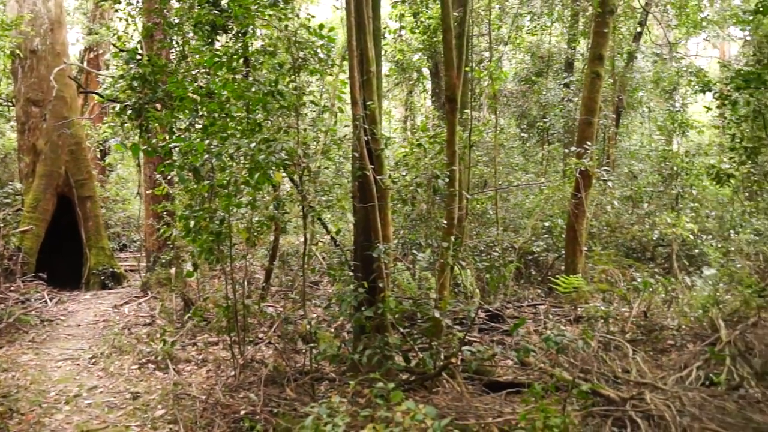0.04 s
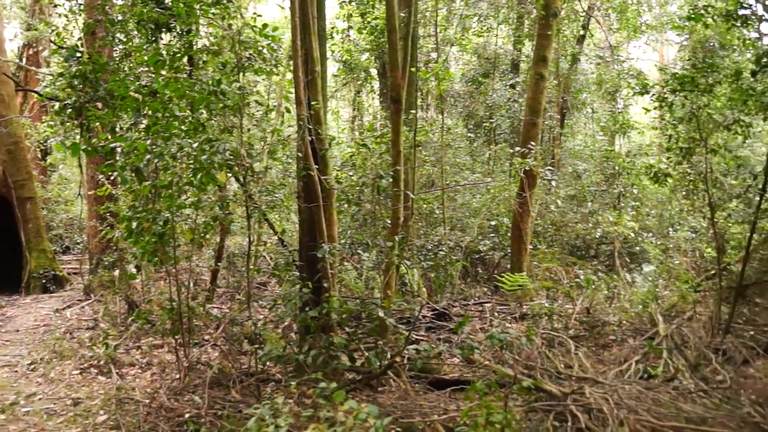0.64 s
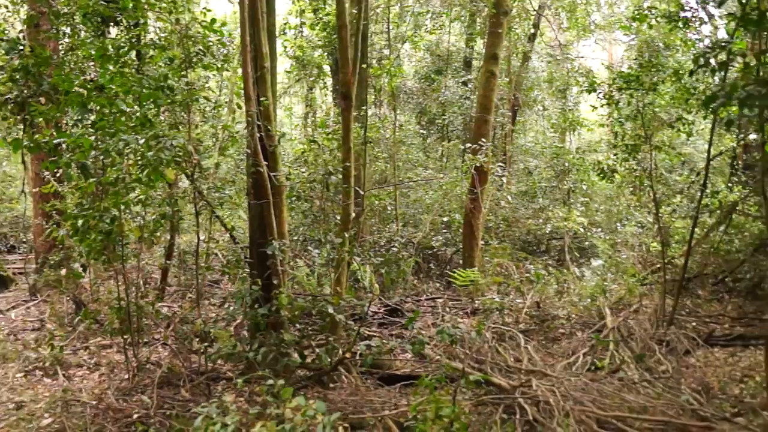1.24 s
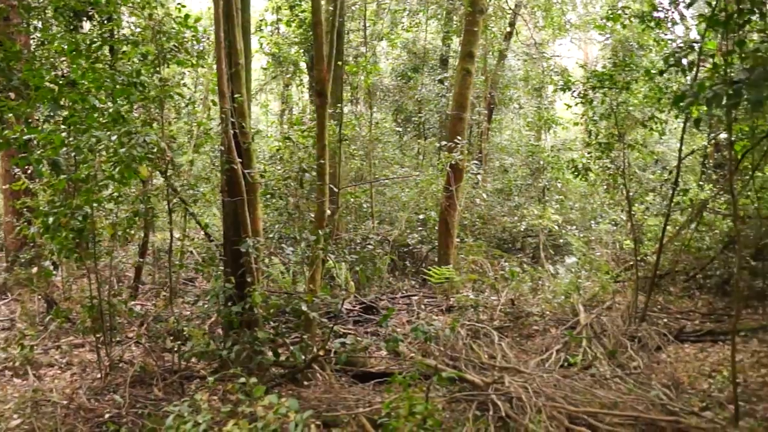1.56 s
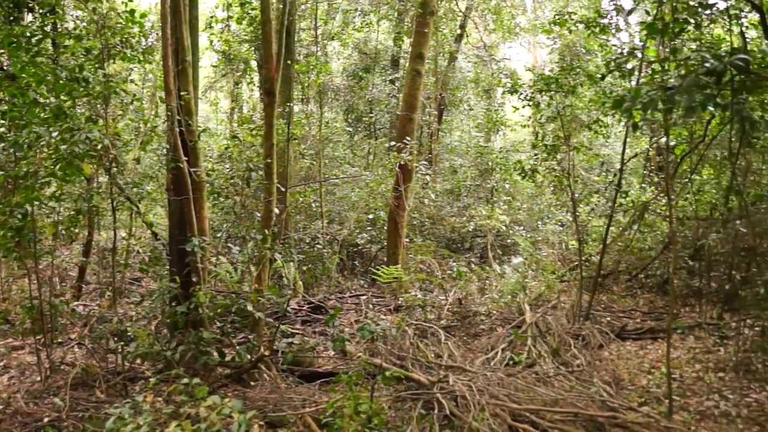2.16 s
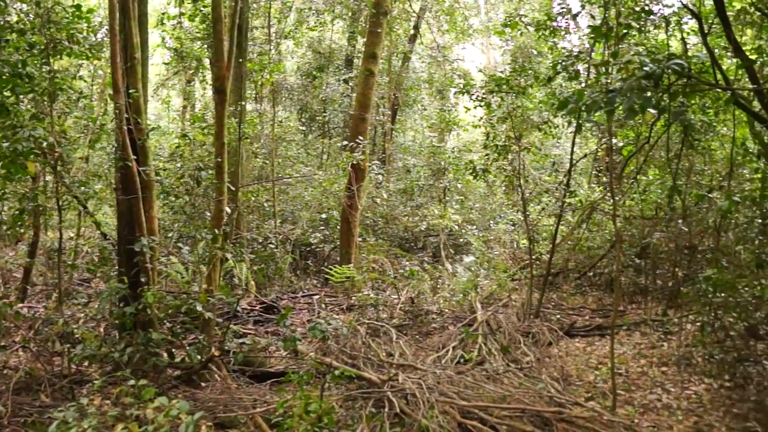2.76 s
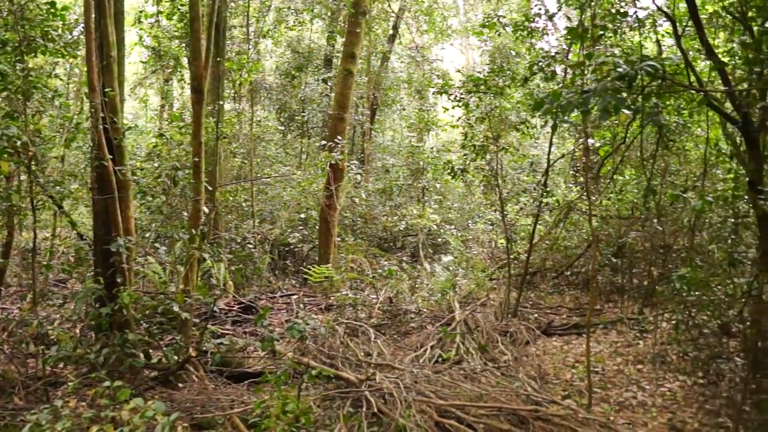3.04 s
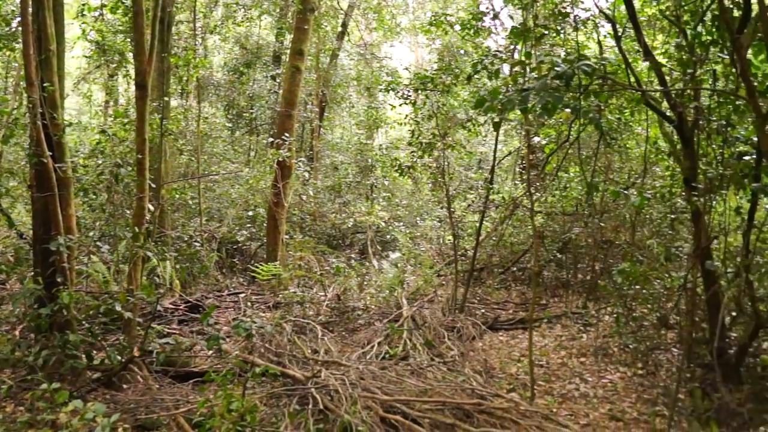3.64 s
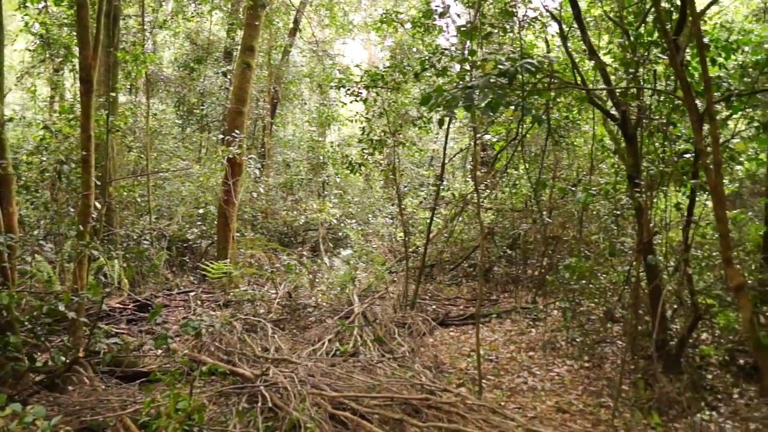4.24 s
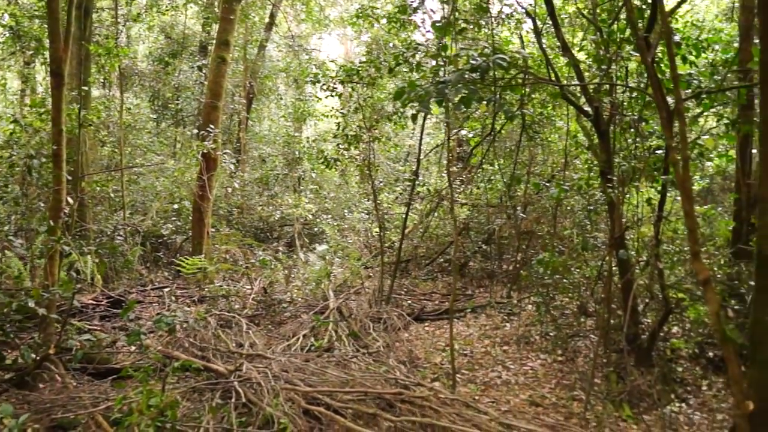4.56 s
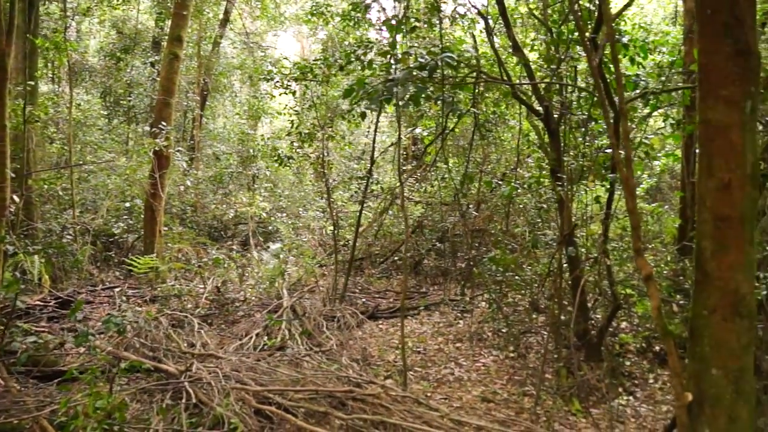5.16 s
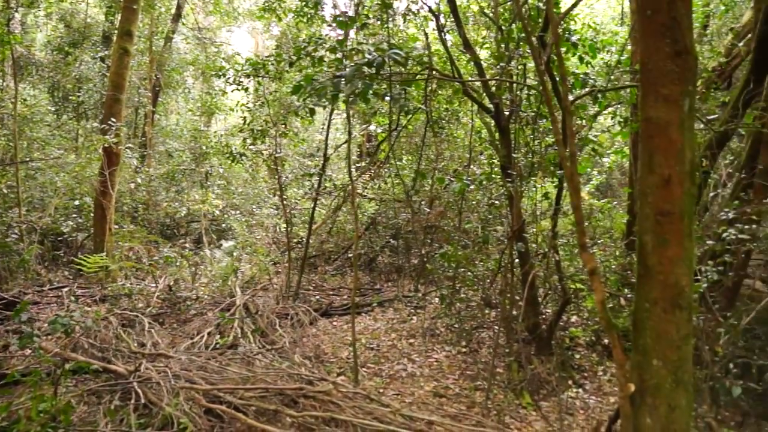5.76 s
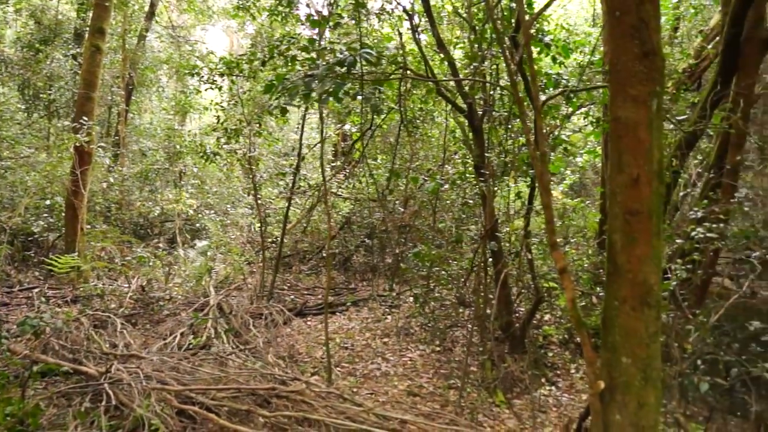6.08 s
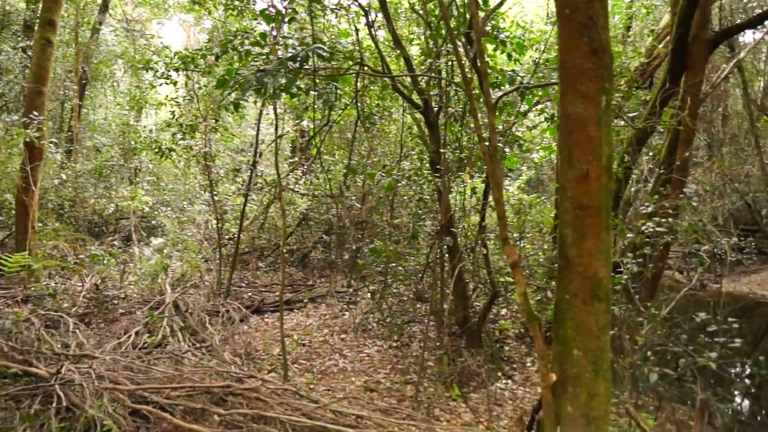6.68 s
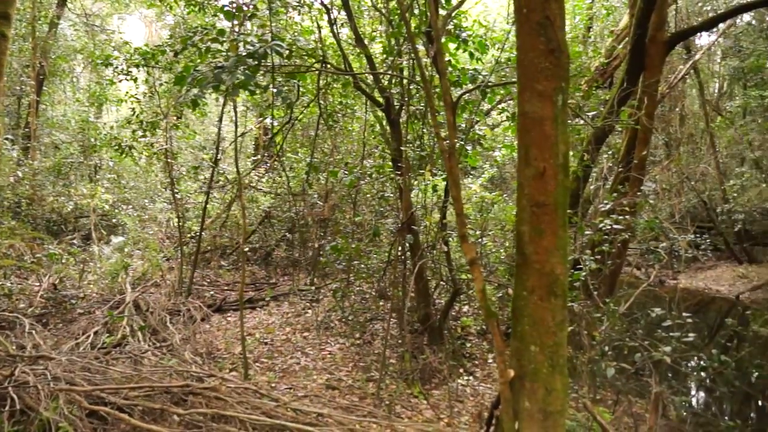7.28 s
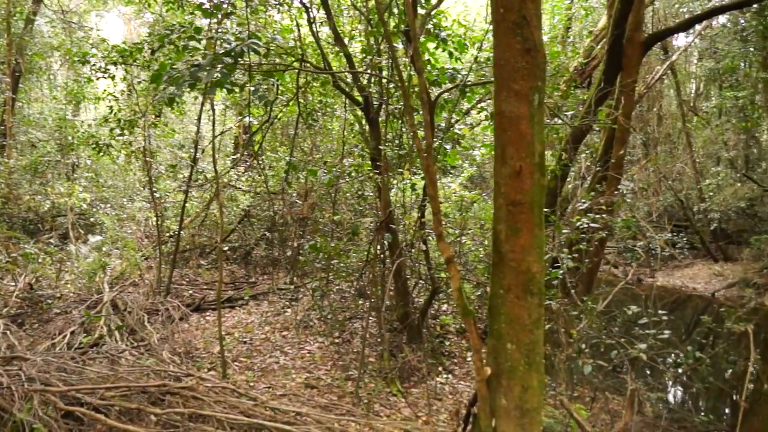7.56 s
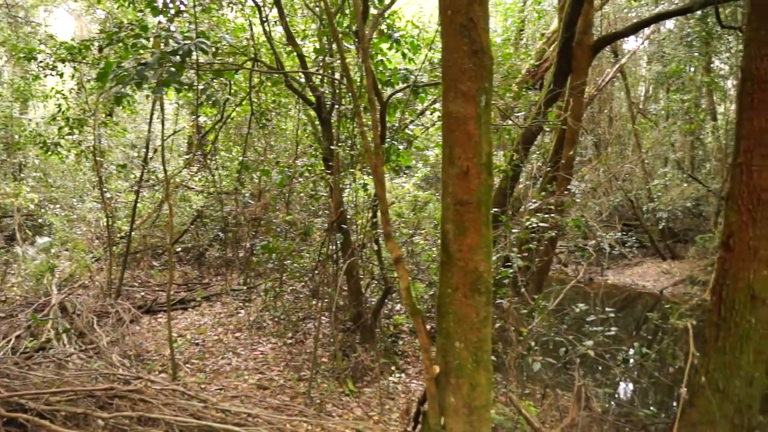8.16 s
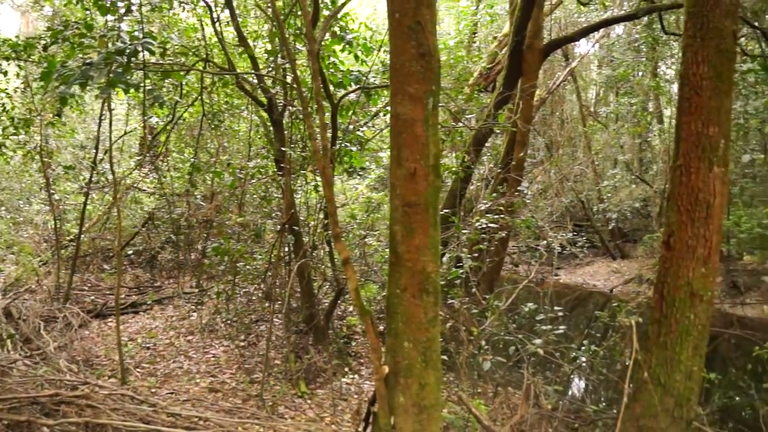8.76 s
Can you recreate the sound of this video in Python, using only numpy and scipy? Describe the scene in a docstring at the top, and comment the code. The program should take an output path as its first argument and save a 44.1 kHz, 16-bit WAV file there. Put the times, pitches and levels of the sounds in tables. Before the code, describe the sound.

In a still rainforest, a whipbird on the left swells a pure whistle into a rising whip crack. A closer one then holds a higher whistle and ends it with three loud falling notes. A third, farther off on the right, answers with a row of pips and two slurs. Small birds chirp thinly throughout over a faint hush of air, and the trees scatter each call into a short echo.

```python
"""Whipbirds in a still rainforest

Three whipbirds each swell a pure whistle or a row of pips, and end it in a whip crack,
three loud falling notes or two slurs. Small birds chirp and call thinly overhead, others
pipe far off. Every note is a slightly wavering tone that trunks and leaves scatter into
a grainy tail. Behind them lie a hush of air, distant birds, a rustle and a few ticks."""
import sys
import numpy as np
from scipy import signal
from scipy.fft import rfft, irfft
from scipy.io import wavfile
from scipy.ndimage import uniform_filter1d

SR = 44100
rng = np.random.default_rng(int(sys.argv[2]) if len(sys.argv) > 2 else 0)


def store_wav(level_fs):
    """Save 16-bit WAV to argv[1]."""
    pcm = np.round(np.clip(np.atleast_2d(level_fs), -1, 1) * 32767)
    wavfile.write(sys.argv[1], SR, pcm.T.astype(np.int16))


N = 388962


def gain(db):
    """Turn decibels into a number to multiply by."""
    return 10 ** (np.asarray(db) / 20)


def unit(x):
    """Scale a signal to an average (rms) strength of 1."""
    return x / np.sqrt(np.mean(x ** 2))


def sides(pan_db):
    """Left and right gains: the left is pan_db louder."""
    return gain(np.array([[pan_db], [-pan_db]]) / 2)


def wander(rate, size):
    """A random drift of about 1 up or down, turning about rate times a second."""
    step = max(int(SR / rate), 1)
    stairs = np.repeat(rng.standard_normal(size // step + 1), step)
    return 1.256 * uniform_filter1d(stairs, step)[:size]


def on_log_axis(points, hz):
    """Read between (Hz, value) points, giving each octave equal room."""
    point_hz, value = np.transpose(points)
    return np.interp(np.log(hz + 1), np.log(point_hz), value)


def moments(length):
    """Times within a note, in seconds from its start."""
    return np.arange(0, max(length, .005), .0005)


def envelope(t, attack_s, release_s):
    """Fade in, hold and fade out, in dB."""
    ramps = np.clip([t / attack_s, (t[-1] - t) / release_s], .01, 1)
    return 20 * np.log10(np.prod(np.sin(np.pi / 2 * ramps) ** 2, axis=0))


def note(start, length, hz, db, glide=0, scoop=0, warble=0, turns=0, settle=0, attack=.1, release=.24):
    """Plan a note as rows of (seconds, Hz, dB): it scoops onto its pitch, glides and warbles."""
    t = moments(length)
    progress = t / t[-1]  # attack and release are shares of the length
    quiver = warble * np.exp(-settle * progress) * np.cos(2 * np.pi * turns * progress)
    bend = glide * (progress - .5) - scoop * np.exp(-progress / .119) - quiver
    return np.column_stack([start + t, hz * np.exp(bend), db + envelope(progress, attack, release)])


def sing(notes, waver, waver_rate, overtone_db, flutter_db=1):
    """A bird's voice: each planned note is a nearly pure tone, never quite steady."""
    out = np.zeros(N + SR)
    for rows in notes:
        times, hz, db = np.transpose(rows)
        t = np.arange(times[0], times[-1] + 1 / SR, 1 / SR)
        pitch = np.exp(uniform_filter1d(np.interp(t, times, np.log(hz)), size=200, mode="nearest"))
        pitch *= 1 + waver * wander(waver_rate, 2 * SR)[:len(t)]
        phase = 2 * np.pi * np.cumsum(pitch) / SR
        strength = gain(np.interp(t, times, db) + flutter_db * wander(waver_rate, 2 * SR)[:len(t)])
        edges = np.clip(np.minimum(t - t[0], t[-1] - t) / .004, 0, 1)
        tone = np.sin(phase) + gain(overtone_db) * np.sin(2 * phase)
        start = max(int(times[0] * SR), 0)
        out[start:start + len(t)] += np.sqrt(2) * tone * edges * strength
    return out[:N]


def forest(x, direct_db, near_db, deep_db, pan_db=0, echo_pan_db=0,
           near_fade_s=.85, deep_fade_s=1.7, treble_loss=.37, width=.46):
    """The direct sound, a quick scatter from near trunks and a long tail from deep among the trees."""
    t = np.arange(int(1.5 * SR)) / SR
    mid, side = rng.standard_normal((2, 2, 1, len(t)))
    # the echoes are partly alike on left and right
    trunks, deep = mid + width * side * np.array([[1], [-1]])
    grain = gain(7.5 * rng.standard_normal(len(t)))
    trunks = trunks * grain * gain(-60 * t / near_fade_s) * (1 - np.exp(-t / .0017))
    deep = deep * gain(-60 * t / deep_fade_s) * (1 - np.exp(-t / .016))
    deep = signal.lfilter([1], [1, -treble_loss], deep)  # leaves soak up treble on long paths
    echoes = gain(near_db) * unit(trunks) + gain(deep_db) * unit(deep)
    response = echoes / np.sqrt(len(t)) * sides(echo_pan_db)
    response[:, :1] += gain(direct_db) * sides(pan_db)
    return signal.fftconvolve(x[None], response, axes=1)[:, :N]


# The tone of the air. Each row: frequency in Hz, relative level in dB.
AIR_TONE = [(15, -22), (36, -4.5), (75, -2), (120, -5.5), (230, -3), (450, -6), (900, -8.5), (1450, -11),
            (2000, -5), (2700, -13.5), (3700, -16), (7000, -21), (8300, -20.5), (11000, -25.5)]
# How alike the air is left and right. Each row: frequency in Hz, likeness (1 is the same).
AIR_LIKENESS = [(30, 0.91), (80, 0.88), (170, 0.51), (350, 0.017), (1000, 0.017), (9000, 0.4)]
# A far, low drone. Each row: pitch in Hz, width in Hz, level in dB.
DRONE_BANDS = [(77.5, 5, -72), (164, 5.2, -70.5)]


def hush(air_db=-51.5):
    """Faint steady air, most alike on both sides in the bass, with a distant drone."""
    hz = np.arange(N // 2 + 1) * SR / N
    mid, side, hum = rfft(rng.standard_normal((3, N)))
    alike = on_log_axis(AIR_LIKENESS, hz)
    stereo = mid * np.sqrt(1 + alike) + np.array([[1], [-1]]) * side * np.sqrt(1 - alike)
    air = unit(irfft(stereo * gain(on_log_axis(AIR_TONE, hz)), N))
    drone = sum(gain(db) * unit(irfft(hum / (1 + ((hz - pitch) / width) ** 2), N))
                for pitch, width, db in DRONE_BANDS)
    return air * gain(air_db) + drone


def rustle(start=6.0, length=1.66, hz=800, db=-66):
    """A faint, uneven, dull rustle comes and goes."""
    t = moments(length)
    swell_db = np.interp(np.arange(N) / SR, start + t, envelope(t, .1, .3))
    band = signal.butter(2, [hz / 1.5, hz * 1.45], "band", fs=SR, output="sos")
    noise = signal.sosfilt(band, rng.standard_normal((2, N)))
    return unit(noise) * gain(db + swell_db + 5 * wander(6.9, N))


# Ticks on the forest floor. Each row: start in seconds, pitch in Hz, relative level in dB.
LEAF_TICKS = [(.308, 8500, -55), (1.334, 350, -46), (4.03, 6000, -58), (6.648, 7000, -59),
              (7.798, 5300, -56)]


def leaf_ticks(decay_s=.0015):
    """Something small drops on dry leaves: a brief burst of noise around one pitch."""
    out = np.zeros(N)
    t = np.arange(SR // 20) / SR
    for start, hz, db in LEAF_TICKS:
        band = signal.butter(2, [hz / 1.2, hz * 1.4], "band", fs=SR)
        burst = unit(signal.lfilter(*band, rng.standard_normal(len(t))))
        first = int(start * SR)
        out[first:first + len(t)] += burst * np.exp(-t / decay_s) * gain(db)
    return forest(out, direct_db=12.5, near_db=-23, deep_db=-12, pan_db=-3, echo_pan_db=2)


def distant_chorus(count=60, hz=2050, db=-68):
    """Many far calls, rising or falling, blurred by the trees into a soft band."""
    starts = (np.arange(count) + rng.random(count)) / count * N / SR
    notes = [note(start, .12, hz * np.exp(.14 * higher), db + 3 * louder, glide=.218 * np.sign(slope))
             for start, (higher, louder, slope) in zip(starts, rng.standard_normal((count, 3)))]
    calls = sing(notes, waver=.0219, waver_rate=82.7, overtone_db=-38)
    return forest(calls, direct_db=-15, near_db=-6, deep_db=0)


# Short rising notes. Each row: start in seconds, pitch in Hz, relative level in dB.
RISING_CALLS = [(1.241, 2750, -58), (1.457, 2670, -54), (2.685, 2700, -57), (2.903, 2640, -50.5),
                (4.0, 2250, -50), (4.245, 2230, -47.5), (4.32, 2567, -49), (4.477, 2580, -48),
                (5.545, 2250, -48), (8.352, 2680, -49.5), (8.576, 2675, -51)]
# Drooping notes. Each row: start and length in seconds, pitch in Hz, relative level in dB.
DROOPING_CALLS = [(.263, 0.073, 7680, -61), (.274, .11, 1973, -54.5), (3.875, .15, 2176, -58),
                  (4.704, 0.088, 1956, -55), (4.918, 0.077, 1930, -52.5), (5.407, 0.14, 2000, -62),
                  (6.438, 0.18, 1977, -51.5), (6.79, .06, 7310, -53), (6.76, .17, 1221, -56),
                  (6.847, .13, 1648, -48.5), (7.757, .098, 1968, -52), (8.077, 0.27, 1821, -52.5),
                  (8.2, 0.17, 1213, -57.5)]


def far_birds():
    """Single notes slide up or down, deep in the forest."""
    rising = [note(start, .0279, hz, db, glide=.267) for start, hz, db in RISING_CALLS]
    drooping = [note(*row, glide=-.1815) for row in DROOPING_CALLS]
    calls = sing(rising + drooping, waver=.025, waver_rate=130, overtone_db=-35)
    return forest(calls, direct_db=-6, near_db=-2, deep_db=-.5, near_fade_s=.35, deep_fade_s=1)


# Piping notes. Each row: start and length in seconds, pitch in Hz, relative level in dB.
PIPING_NOTES = [(0, 0.065, 3315, -64), (.95, .23, 3134, -63), (1.962, 0.078, 3340, -43.5),
                (2.134, 0.074, 3325, -40.5), (4.123, .045, 2542, -48.5), (4.399, 0.13, 3330, -46),
                (4.56, .13, 3286, -52), (5.416, 0.11, 4350, -57), (6.396, 0.117, 4310, -51),
                (6.918, 0.11, 3356, -43.5), (7.085, 0.046, 3294, -42), (6.94, .16, 5230, -55)]


def piping_birds():
    """Clear, almost level notes from far off."""
    notes = [note(*row, glide=-.016, attack=.074, release=.33) for row in PIPING_NOTES]
    calls = sing(notes, waver=.004, waver_rate=80, overtone_db=-40)
    return forest(calls, direct_db=-1, near_db=-4.5, deep_db=-4, pan_db=2.5, deep_fade_s=1)


# Thin, high calls. Each row: start in seconds, pitch in Hz, relative level in dB.
OVERHEAD_CALLS = [(.33, 8500, -55.5), (.745, 8340, -51), (1.28, 8470, -50.5), (1.822, 8290, -48),
                  (2.449, 8750, -53.5), (2.991, 8500, -49), (3.499, 8210, -47), (4.178, 8130, -48.5),
                  (4.827, 8180, -47), (5.41, 8280, -48.5), (6.43, 8260, -45.5), (6.883, 8130, -50.5),
                  (7.001, 8230, -52.5), (7.31, 7850, -56), (7.8, 8530, -57.5), (8.335, 8440, -46)]


def overhead_birds():
    """Thin warbles from birds hidden in the leaves, heard mostly as scattered sound."""
    notes = [note(start, .13, hz, db, glide=-.0385, scoop=-.08, warble=.0331, turns=3.5,
                  attack=.22, release=.054) for start, hz, db in OVERHEAD_CALLS]
    calls = sing(notes, waver=.017, waver_rate=600, overtone_db=-60, flutter_db=2)
    return forest(calls, direct_db=-15, near_db=-6, deep_db=1.5, pan_db=-3, echo_pan_db=-3,
                  deep_fade_s=.8, width=.9)


# Opening flicks. Each row: start in seconds, pitch in Hz, relative level in dB.
SONG_FLICKS = [(1.335, 4810, -45), (2.565, 4630, -42), (7.822, 4450, -47.5), (8.394, 4740, -40)]
# Climbs of three notes. Each row: start in seconds, relative level of the first note in dB.
SONG_CLIMBS = [(3.063, -49), (8.049, -49)]
# Double chips. Each row: start and spacing in seconds, pitch in Hz, relative level in dB.
SONG_CHIPS = [(1.53, 0.11, 5590, -41.5), (2.119, 0.088, 5620, -40), (2.726, 0.089, 5580, -38.5),
              (3.312, 0.062, 5434, -41), (8.548, 0.11, 5594, -39)]


def songbird(climb_hz=3674, step_hz=308, step_db=3, step_s=.066, chip_drop_hz=50):
    """A flick or a climb leads in to a pair of chips that quiver and settle."""
    flicks = [note(start, .038, hz, db, warble=.28, turns=1.15, settle=2.1, attack=.2, release=.1)
              for start, hz, db in SONG_FLICKS]
    climbs = [note(start + k * step_s, .0427, climb_hz + k * step_hz, db + k * step_db,
                   glide=.16, scoop=.16, attack=.35)
              for start, db in SONG_CLIMBS for k in range(3)]
    chips = [note(start + k * spacing, .054, hz - k * chip_drop_hz, db,
                  scoop=.12, warble=.13, turns=1.8, settle=2.8, attack=.14, release=.15)
             for start, spacing, hz, db in SONG_CHIPS for k in range(2)]
    song = sing(flicks + climbs + chips, waver=.014, waver_rate=400, overtone_db=-45, flutter_db=2.5)
    return forest(song, direct_db=-7, near_db=-.5, deep_db=1.5, pan_db=-4, echo_pan_db=-2,
                  near_fade_s=.33, deep_fade_s=.8, width=.7)


def slur_down(start=6.906, length=.113, top_hz=2990, low_hz=1260, db=-33):
    """An even slide down."""
    t = moments(length)
    pitch = top_hz + (low_hz - top_hz) * t / t[-1]
    return np.column_stack([start + t, pitch, db + envelope(t, .024, .025)])


def slur_up(start=7.148, length=.34, low_hz=1700, top_hz=2965, rise_s=.043, db=-32, fade_db_per_s=42):
    """A quick slide up to a held note that dies away."""
    t = moments(length)
    pitch = top_hz + (low_hz - top_hz) * np.exp(-(t / rise_s) ** 2)
    return np.column_stack([start + t, pitch, db - fade_db_per_s * t + envelope(t, .03, .12)])


# Swelling pips, the last one long and sagging. Each row: start and length in seconds,
# pitch in Hz, relative level in dB, glide as a share of the pitch.
WHIPBIRD_PIPS = [(5.775, 0.063, 1513, -50, 0.023), (6.025, 0.065, 1490, -44, 0.012),
                 (6.25, 0.082, 1507, -37.5, 0.0056), (6.455, .11, 1528, -35.5, 0.018),
                 (6.69, .2, 1486, -35.5, -0.04)]


def far_whipbird():
    """A row of pips on the right breaks into a slur down and a slur up."""
    notes = [note(*row, attack=.45, release=.45) for row in WHIPBIRD_PIPS]
    pips = sing(notes, waver=.004, waver_rate=30, overtone_db=-45)
    slurs = sing([slur_down(), slur_up()], waver=.0035, waver_rate=200, overtone_db=-31, flutter_db=2.5)
    return (forest(pips, direct_db=-1, near_db=-12, deep_db=-11, pan_db=-3)
            + forest(slurs, direct_db=-2, near_db=-1.5, deep_db=-5, pan_db=-7.5, echo_pan_db=-1))


def long_whistle(effort, hz, scoop_hz, settle_s, throb_db, throb_s):
    """The whistle creeps up to its pitch and throbs in time with its strongest push."""
    times, db = np.transpose(effort)
    t = moments(times[-1] - times[0])
    clock = times[0] + t
    pitch = hz - scoop_hz * np.exp(-t / settle_s)
    throb = throb_db * np.cos(2 * np.pi * (clock - times[np.argmax(db)]) / throb_s)
    return np.column_stack([clock, pitch, np.interp(clock, times, db) + throb])


def whip_crack(start=1.83, length=.139, low_hz=690, top_hz=9500, db=-28):
    """The pitch shoots up ever faster while the tone grows, then it is cut off."""
    t = moments(length)
    pitch = low_hz * (top_hz / low_hz) ** ((t / t[-1]) ** 2.2)
    return np.column_stack([start + t, pitch, db + envelope(t, .13, .015)])


# How hard the first whipbird whistles. Each row: time in seconds, relative level in dB.
FIRST_SWELL = [(0.3, -66), (0.348, -71), (0.67, -49.5), (0.74, -64), (0.842, -50), (0.902, -56.5),
               (1.602, -46), (1.76, -68), (1.87, -51)]


def first_whipbird():
    """A low whistle swells, then a crack whips up through more than three octaves."""
    swell = long_whistle(FIRST_SWELL, hz=1571, scoop_hz=30, settle_s=.45, throb_db=3, throb_s=.185)
    whistle = sing([swell], waver=.003, waver_rate=28, overtone_db=-45, flutter_db=2)
    crack = sing([whip_crack()], waver=.015, waver_rate=300, overtone_db=-32, flutter_db=2.5)
    return (forest(whistle, direct_db=-1.5, near_db=-5, deep_db=-9.5, pan_db=5.5, echo_pan_db=-1.5)
            + forest(crack, direct_db=-6, near_db=-4, deep_db=-2, pan_db=9, echo_pan_db=1.5,
                     near_fade_s=.4, deep_fade_s=1.3))


def falling_note(start, db, length=.104, low_hz=2640, attack_s=.029, fade_db_per_s=150):
    """The pitch dives, lingers halfway, rounds the bottom and hooks back up as the note fades."""
    octaves_per_s, turn_s, round_s = 23.4, .0775, .007
    t = moments(length)
    dive = octaves_per_s * (np.hypot(t - turn_s, round_s) - round_s)
    linger = .1 * np.exp(-((t - .054) / .009) ** 2)
    level = db + envelope(t, attack_s, .011) - fade_db_per_s * np.maximum(t - attack_s, 0)
    return np.column_stack([start + t, low_hz * 2 ** (dive + linger), level])


# How hard the near whipbird whistles. Each row: time in seconds, relative level in dB.
NEAR_SWELL = [(4.2, -66), (4.414, -48.5), (4.44, -56), (4.588, -62), (4.762, -42), (5.18, -42.5),
              (5.21, -36.5), (5.44, -37), (5.53, -52)]
# Its falling notes. Each row: start in seconds, relative level in dB.
FALLING_NOTES = [(5.581, -14.5), (5.805, -13.5), (6.014, -14)]


def near_whipbird():
    """A higher whistle close by on the left, ended by three loud falling notes."""
    swell = long_whistle(NEAR_SWELL, hz=2690, scoop_hz=140, settle_s=.95, throb_db=1.8, throb_s=.19)
    whistle = sing([swell], waver=.0015, waver_rate=30, overtone_db=-36, flutter_db=1.5)
    notes = [falling_note(start, db) for start, db in FALLING_NOTES]
    falls = sing(notes, waver=.008, waver_rate=200, overtone_db=-50, flutter_db=2)
    falls = forest(falls, direct_db=-5.5, near_db=-4.5, deep_db=-11, pan_db=9.5, echo_pan_db=1,
                   near_fade_s=.42, deep_fade_s=1.075, treble_loss=.19, width=.42)
    # the octave above them is beamed past the listener and arrives mostly scattered
    octave = sing([rows * [1, 2, 1] for rows in notes], waver=.007, waver_rate=300, overtone_db=-60)
    octave = forest(octave, direct_db=-34.5, near_db=-30.5, deep_db=-21.5, pan_db=15, echo_pan_db=2,
                    near_fade_s=.5, deep_fade_s=.62)
    whistle = forest(whistle, direct_db=-3, near_db=-27, deep_db=-13, pan_db=12.5, echo_pan_db=-5.5)
    return whistle + falls + octave


def scene():
    """All the birds over the quiet sounds of the forest."""
    whipbirds = first_whipbird() + near_whipbird() + far_whipbird()
    small_birds = overhead_birds() + songbird() + piping_birds() + far_birds()
    return whipbirds + small_birds + distant_chorus() + leaf_ticks() + rustle() + hush()


def record(dry, top_hz=11150):
    """The recorder cuts off the highest treble."""
    return signal.sosfilt(signal.ellip(14, .2, 80, top_hz, fs=SR, output="sos"), dry)


dry = scene()
out = record(dry)
store_wav(out)
```